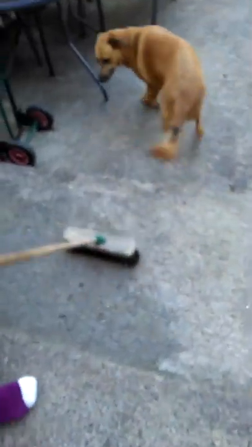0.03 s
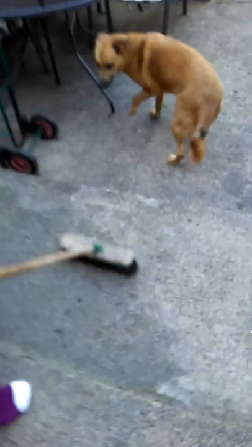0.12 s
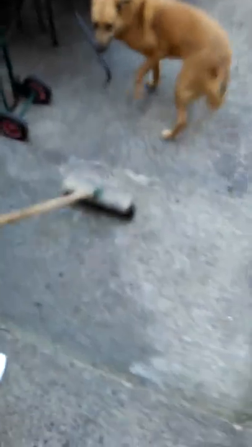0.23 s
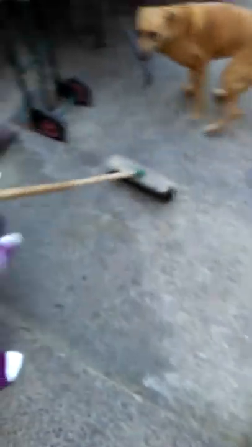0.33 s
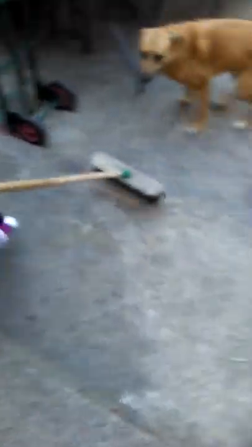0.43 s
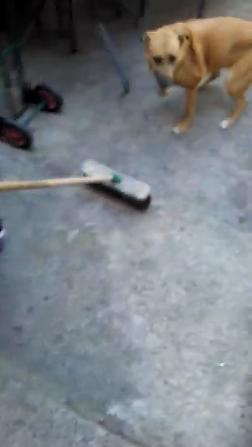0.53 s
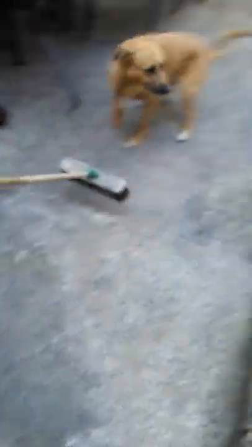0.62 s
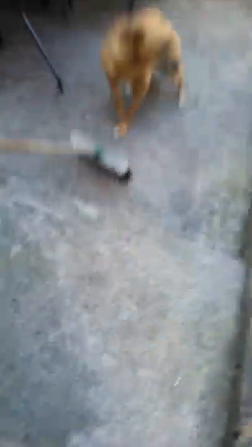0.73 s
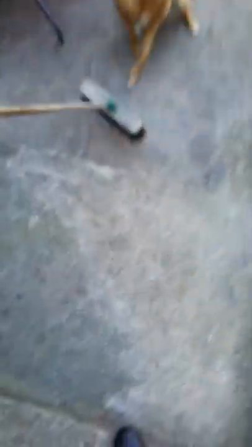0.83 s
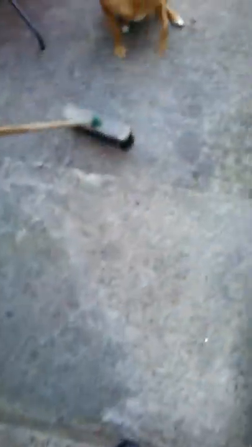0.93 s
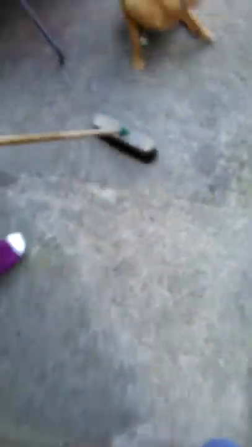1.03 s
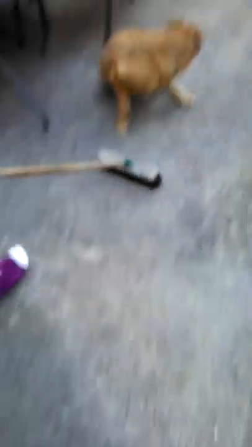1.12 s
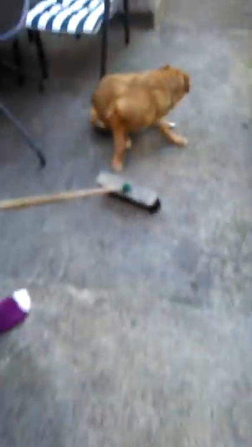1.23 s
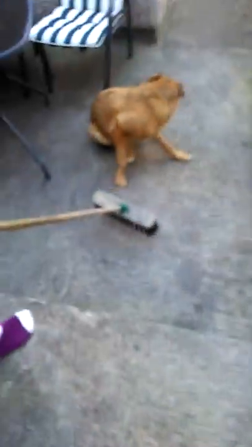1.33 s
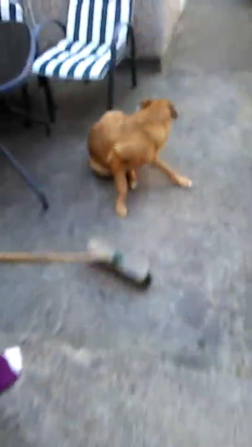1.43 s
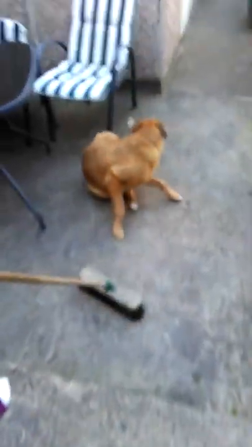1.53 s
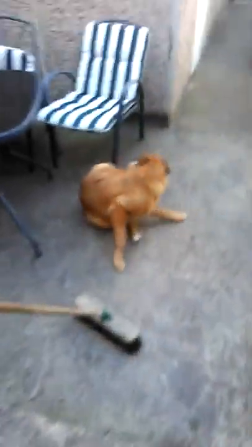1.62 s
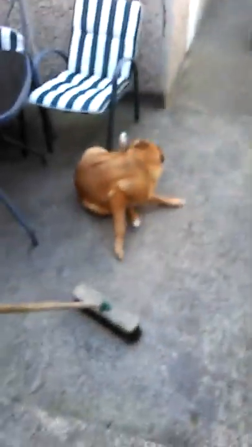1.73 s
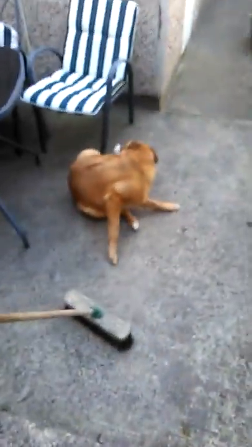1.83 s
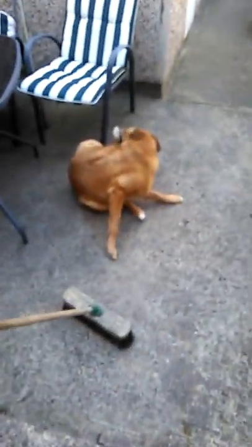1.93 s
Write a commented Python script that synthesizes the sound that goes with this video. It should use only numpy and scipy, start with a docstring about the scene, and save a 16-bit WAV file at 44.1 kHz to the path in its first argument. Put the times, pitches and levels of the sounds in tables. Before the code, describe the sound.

Close up on a patio, broom bristles rasp over concrete, pause, rasp again, then bump hard and scrub; a last brief knock follows, then a dog's low throaty grumble, with soft rumble and a short wall reflection.

```python
"""A concrete patio, close to a push broom scrubbing in short strokes, heard at two microphone ports.
Bristles flick over grit as random clicks and shake the wooden head; narrow bands ring as bristles sing
or the head rings on; short blows ring in modes with a puff of grit. A dog nearby ticks a claw, scuffs
and thumps a paw, and grumbles twice in throat pulses that ring in its chest. A low hum wavers under
rumble and thin outdoor air; the house wall answers the nearby sounds with a decaying tail."""
import sys
import numpy as np
from scipy import signal
from scipy.fft import rfft, irfft, next_fast_len
from scipy.io import wavfile
from scipy.ndimage import uniform_filter1d, map_coordinates

SR = 44100
rng = np.random.default_rng(int(sys.argv[2]) if len(sys.argv) > 2 else 0)


def dump(signal):
    """Clip the signal to [-1, 1] and save it as 16-bit WAV at the path in sys.argv[1]."""
    limited = np.clip(np.atleast_2d(signal).T, -1, 1)
    pcm = np.round(limited * 32767).astype(np.int16)
    wavfile.write(sys.argv[1], SR, pcm)


def gain_from_db(level_db):
    """Turn a decibel level (scalar or array-like) into a linear amplitude factor."""
    decades = np.asarray(level_db, float) / 20
    return 10 ** decades


N = 88200

# spectrum of bristles on gritty concrete: f/Hz, density/dB per Hz (relative)
BRISTLE_SPECTRUM = [(1200, -29.5), (2200, -9.5), (3250, -5), (3650, -3), (4400, -1.5), (5200, -4),
                    (6200, -3.5), (7500, -12), (10000, -17), (13300, -26), (14600, -34)]


def unit(x):
    """Scaled to rms 1."""
    return x / np.sqrt(np.mean(x ** 2) + 1e-20)


def along(points, hz):
    """(Hz, value) points interpolated on a log frequency axis."""
    f, v = np.transpose(points)
    return np.interp(np.log(hz + 1), np.log(f + 1), v)


def curves(rows):
    """One value per sample for each column after the time."""
    s, *cols = np.transpose(rows)
    return [np.interp(np.arange(N) / SR, s, c) for c in cols]


def wobble(rate):
    """A smooth random curve, rate knots a second."""
    knots = rng.standard_normal(int(N * rate / SR) + 4)
    return map_coordinates(knots, [np.arange(N) * rate / SR])


def filtered(x, response):
    """x times a complex response of frequency."""
    m = next_fast_len(N + SR // 2)
    return irfft(rfft(x, m) * response(np.fft.rfftfreq(m, 1 / SR)), m)[..., :N]


def coloured(x, spectrum):
    """x shaped by the given spectrum, rms 1."""
    return unit(filtered(x, lambda hz: gain_from_db(along(spectrum, hz))))


def patchy(x, db):
    """Random patches of gain over time and frequency, db rms."""
    z = signal.stft(x, nperseg=256)[2]
    field = rng.standard_normal(z.shape[-2:])
    field = uniform_filter1d(field, size=4, axis=0)  # frequency bins
    field = uniform_filter1d(field, size=10, axis=1)  # time frames
    return signal.istft(z * gain_from_db(db * unit(field)), nperseg=256)[1][..., :N]


def ports(pair):
    """Two versions of a wide sound reach two ports: alike in the bass, out of step and tinted above."""
    # likeness of the two ports: f/Hz, likeness (0 to 1)
    likeness = [(60, .97), (250, .96), (600, .85), (1400, .62), (3000, .5), (6000, .52), (14000, .45)]
    # tint between the ports: f/Hz, left over right/dB
    tint = [(60, -3), (250, 0), (1000, 0), (2300, 5.5), (4300, 7), (7900, -9.5), (14500, 4.5)]
    # the left port trails the right: f/Hz, phase/radians
    lag = [(150, 0), (400, 0.026), (620, 1.34), (14000, 1.79)]

    def spread(hz):
        """Weights of the shared and the opposed part."""
        turn = np.arccos(np.clip(along(likeness, hz), -1, 1)) / 2
        return np.array([np.cos(turn), np.sin(turn)])

    def tint_and_lag(hz):
        """Half the tint and lag on the left, the inverse half on the right."""
        half = gain_from_db(along(tint, hz) / 2) * np.exp(-.5j * along(lag, hz))
        return np.array([half, 1 / half])

    mid, side = filtered(pair, spread)
    return filtered(np.array([mid + side, mid - side]), tint_and_lag)


def hum():
    """A sine of wavering pitch and level, with a little that is opposite at the two ports."""
    # hum under the scene: t/s, level/dB (rms)
    hum_levels = [(0.0, -48), (0.38, -46.5), (0.42, -40), (0.52, -58), (0.6, -44.5), (1.02, -56.5),
                  (1.09, -36.5), (1.19, -54), (1.26, -43.5), (1.32, -54), (1.64, -44.5), (2.0, -57)]
    level_db, = curves(hum_levels)
    pitch_hz = 54.5 + 2.2 * wobble(7.22)
    phase = 2 * np.pi * np.cumsum(pitch_hz) / SR
    opposed = gain_from_db(-16.5) * np.cos(phase) * wobble(7.4) * [[1], [-1]]
    return np.sqrt(2) * gain_from_db(level_db) * (np.sin(phase) + opposed)


def outdoors():
    """Low rumble and thin air from all around: coloured noise whose levels drift."""
    # low rumble: f/Hz, density/dB per Hz (relative)
    rumble_spectrum = [(60, -47), (85, 3), (110, -5.5), (140, -1.5), (180, -10.5), (300, -18), (500, -29.5),
                       (800, -41.5)]
    # open air: f/Hz, density/dB per Hz (relative)
    air_spectrum = [(180, -37), (300, -6.5), (813, -13), (2200, -22.5), (3970, -27.5), (6170, -47),
                    (13100, -41.5), (14900, -60)]
    rumble = coloured(rng.standard_normal((2, N)), rumble_spectrum)
    rumble = gain_from_db(-59 + 2.4 * wobble(12.09)) * rumble
    air = coloured(patchy(rng.standard_normal((2, N)), db=-2.5), air_spectrum)
    air = gain_from_db(-65 + 3.3 * wobble(5.47)) * air
    return ports(rumble + air)


def flicks(patch_db, per_s=7000):
    """Bristle tips letting go of the grit at random, in clumps, in two independent versions."""
    fire = rng.random((2, N)) < per_s / SR
    size = gain_from_db(2.5 * rng.exponential(size=(2, N)).clip(0, 3.2))
    size = size * rng.choice([-1, 1], (2, N))
    clumps = gain_from_db(0.45 * wobble(80))
    return patchy(fire * size * clumps, patch_db)


def sweep():
    """Flicks hiss with changing brightness; further flicks shake the wooden head."""
    # bristles on the ground, stroke after stroke: t/s, scrape level/dB (ahead of the brightness),
    # shaken head over scrape level/dB, brightness/dB (treble up and bass down by as much)
    strokes = [(0, -80, 4, 12), (.012, -60.5, -9, -13.5), (.03, -67.5, -25, -3), (.0795, -77, -4, 7),
               (.081, -50, -10, 8.5), (.103, -65, 2, 13), (.1095, -63, 0, 7), (.111, -41.5, -7, 7),
               (.139, -55, -5, -1), (.185, -54, -5, 7.5), (.225, -35.5, -9, 3.5), (.272, -27, -9, 3.5),
               (.342, -26.5, -15, 3), (.40, -46.5, -8.5, 3.5), (.465, -59, -3.5, -0.5), (.54, -65, -3.5, 6),
               (.6245, -72, 12, 11), (.6275, -36, 5.5, 3), (.637, -33, -7, 0.5), (.669, -30.5, -15, 1.5),
               (.70, -43.5, -9.5, -0.5), (.765, -59, -9, 0), (.82, -56.5, -9.5, 0), (.845, -49, -7, -5.5),
               (.885, -54, -8.5, -2), (1.028, -63.5, -12, -6.5), (1.0525, -68, 7, -12.5),
               (1.0555, -36.5, 1, 5), (1.064, -35, -2, -4), (1.075, -30.5, -8.5, 0),
               (1.152, -29.5, -11.5, 1), (1.195, -35, -16.5, 0.5), (1.258, -56.5, -12.5, -3.5),
               (1.376, -65.5, -16, -1), (1.5115, -78.5, -19, -11.5), (1.515, -55, 7, -10),
               (1.5235, -46.5, -6, -10), (1.526, -35, -2, -3), (1.534, -41, 2, -1), (1.541, -34, 1.5, -3.5),
               (1.561, -43.5, -4.5, -2.5), (1.615, -55.5, -8.5, 0.5), (1.745, -61.5, -17, 6.5),
               (1.77, -63.5, -25, -2.5), (1.965, -76.5, -20, -8.5), (2, -64.5, -13, 6)]
    # the head, shaken by the bristles: f/Hz, density/dB per Hz (relative)
    shaken_head = [(200, -83), (380, -26), (465, -7), (560, -14.5), (750, -5.5), (960, -3), (1200, -9.5),
                   (1560, 0.5), (1850, 1), (2150, -14), (2500, -9), (3300, -27.5)]
    level_db, head_db, bright_db = curves(strokes)
    hiss = coloured(flicks(patch_db=1.5), BRISTLE_SPECTRUM)
    dull = filtered(hiss, lambda hz: 1 / (1 + (hz / 4500) ** 4))
    hiss = gain_from_db(-bright_db) * dull + gain_from_db(bright_db) * (hiss - dull)
    head = coloured(flicks(patch_db=3), shaken_head)
    return gain_from_db(level_db) * (hiss + gain_from_db(head_db) * head)


def grit_noise():
    """Noise in the colour of the bristles on grit, for the puffs in blows."""
    return coloured(rng.standard_normal((2, N)), BRISTLE_SPECTRUM)


def strike(s, db, centre_hz, crack_db, modes, grit):
    """One blow: the modes near its colour ring most, with a puff of grit."""
    t, at = np.arange(SR // 4) / SR, round(s * SR)
    rings = np.zeros((2, len(t)))
    for hz, mode_db, t60 in modes:
        luck_db = 1.6 * rng.standard_normal((2, 1))
        off_colour_db = 5.96 * (np.log2(hz / centre_hz) / 0.77) ** 2  # distance in units of 0.77 octave
        ring_db = mode_db + luck_db - off_colour_db - 60 * t / t60
        rings += gain_from_db(ring_db) * np.sin(2 * np.pi * hz * t)
    rings *= (1 - np.exp(-t * centre_hz / 0.22)) ** 2  # soft rise, 0.22 cycles of its colour
    crack_t60_s = 0.019
    puff = gain_from_db(crack_db - 60 * t / crack_t60_s) * np.roll(grit, -at, axis=1)[:, :len(t)]
    out = np.zeros((2, N + SR))
    out[:, at:at + len(t)] = gain_from_db(db) * (puff - rings / np.abs(rings[0]).max())
    return out[:, :N]


def claw_tick():
    """A claw ticks on the concrete and rings briefly in its modes."""
    # ticks close by: t/s, peak level/dB (first version, ahead of the ports)
    claw_ticks = [(0.0074, -32)]
    # claw modes: f/Hz, level/dB (relative), t60/s
    claw_modes = [(2420, 11, 0.0049), (4590, 11.5, 0.0067)]
    grit = grit_noise()
    return sum(strike(s, db, 3100, -43, claw_modes, grit) for s, db in claw_ticks)


def wall(x):
    """The house wall's answer, 500 samples late: each frequency dies at its own speed."""
    # decay of the answer: f/Hz, t60/s
    wall_decay = [(200, 0.42), (2000, 0.2), (10000, 0.12)]
    hz, t, z = signal.stft(rng.standard_normal((2, SR // 2)), SR, nperseg=256)
    decay = gain_from_db(-60 * t / along(wall_decay, hz)[:, None])
    tail = signal.istft(z * decay, SR, nperseg=256)[1]
    tail = tail / np.linalg.norm(tail[0])
    late = np.pad(x, (500, 0))[None]
    return gain_from_db(-17) * signal.fftconvolve(late, tail, axes=1)[:, :N]


def short_blows():
    """Short blows nearby: wooden knocks, a bright bite of bristles on grit, faint low thuds."""
    # blows close by: t/s, peak level/dB (ring, first version, ahead of the ports),
    # centre of its colour f/Hz, grit crack over the peak level/dB
    blows = [(0.0817, -40, 860, -11), (0.1092, -29, 920, -29), (0.114, -29, 480, -9.5),
             (0.6281, -28.5, 1540, -21), (0.632, -31, 1700, -23), (.630, -29.5, 460, -30),
             (0.662, -35.5, 287, -23), (1.054, -28, 980, -35), (1.0572, -21.5, 4300, -5),
             (1.0712, -20.5, 386, -11), (1.073, -16.5, 316, -28), (1.081, -24, 255, -17),
             (1.11, -29.5, 209, -28), (1.278, -45, 198, -8), (1.4467, -48, 1640, -10),
             (1.526, -29, 397, -4), (1.5372, -13, 328, -16.5), (1.5474, -21.5, 316, -37),
             (1.578, -25, 290, -40), (1.604, -35, 141, -37), (1.781, -43.5, 120, -33),
             (1.834, -44.5, 282, -11)]
    # modes that the blows share: f/Hz, level/dB (relative), t60/s
    blow_modes = [(120, -0.5, 0.16), (189.6, 10.5, 0.031), (253.7, -0.5, 0.043), (313.3, -4, 0.091),
                  (380, 6.5, 0.028), (492, 6, 0.012), (686, 8.5, 0.016), (922, 3, 0.038),
                  (1242, -6.5, 0.072), (1540, -4, 0.051), (1973, -9, 0.056), (4300, -6, 0.011)]
    grit = grit_noise()
    return sum(strike(*row, blow_modes, grit) for row in blows)


def ringing_bands():
    """Narrow bands of flicks, swelling and fading: bristles singing, and once the wooden head ringing on."""
    # narrow ringing bands: start t/s, length/s, level/dB (top of the swell), pitch f/Hz
    bands = [(0.232, 0.13, -38, 6100), (0.638, 0.028, -44, 1490), (0.83, 0.055, -56.5, 2470),
             (1.077, 0.14, -33.5, 4310), (1.11, 0.062, -47, 3280), (1.616, 0.15, -58, 3120)]
    t, out = np.arange(N) / SR, 0
    tips = flicks(patch_db=1.5, per_s=2000)
    for s, length, db, hz in bands:
        width_hz = 0.15 * hz
        band = filtered(tips, lambda f: 1j * f / (hz * hz - f * f + 1j * f * width_hz))
        swell = np.sqrt(np.abs(np.sin(np.pi * np.clip((t - s) / length, 0, 1))))
        out = out + gain_from_db(db) * swell * unit(band)
    return out


def paw_scuffs():
    """A paw drags softly: short rubs of noise that start quickly and fade."""
    # rubs close by: start t/s, length/s, level/dB (top of the swell)
    scuffs = [(0.47, 0.084, -49.5), (0.939, 0.037, -57.5)]
    # paw pad on concrete: f/Hz, density/dB per Hz (relative)
    pad_spectrum = [(250, -30), (460, 3), (650, -8), (950, -12.5), (1500, -3.5), (1850, -31.5)]
    t, shape = np.arange(N) / SR, 0
    for s, length, db in scuffs:
        progress = np.clip((t - s) / length, 0, 1)
        shape = shape + gain_from_db(db) * np.sin(np.pi * progress ** 0.46)
    return shape * coloured(rng.standard_normal((2, N)), pad_spectrum)


def paw_thump():
    """A paw lands with a soft thump, a short low ring."""
    # thumps close by: t/s, peak level/dB (first version, ahead of the ports)
    thumps = [(1.445, -38)]
    # paw mode: f/Hz, level/dB (relative), t60/s
    paw_modes = [(270, 0, 0.049)]
    grit = grit_noise()
    return sum(strike(s, db, paw_modes[0][0], -42, paw_modes, grit) for s, db in thumps)


def grumbles():
    """The dog's slow throat pulses ring in the chest, swelling and fading."""
    # dog nearby: start t/s, length/s, level/dB (top of the swell), pulse rate at start and end f/Hz
    growls = [(1.645, 0.12, -40, 70.8, 66.6), (1.873, 0.098, -45, 56.8, 75.7)]
    # chest resonances, passed twice: f/Hz, width/Hz and level/dB of one pass
    chest_modes = [(144.5, 40, 0.5), (227.5, 74, 2), (271, 51, -2)]
    t, pulses = np.arange(N) / SR, np.zeros(N)
    for s, length, db, first, last in growls:
        u = np.clip((t - s) / length, 0, 1)
        jitter = 1 + 0.012 * wobble(50)
        rate = (first + (last - first) * u) * jitter
        beats = np.diff(np.floor(np.cumsum(rate * (t > s)) / SR), prepend=0)
        swell = np.sin(np.pi * u) ** 1.3
        pulses += gain_from_db(db) * swell * beats * np.sqrt(SR / rate)  # equal power at any rate

    def chest(f):
        """Resonances of alternating sign, passed twice."""
        once = 0
        for k, (c, w, db) in enumerate(chest_modes):
            once = once + (-1) ** k * gain_from_db(db) * 1j * f * w / (c * c - f * f + 1j * f * w)
        return once ** 2

    gain = np.sqrt(np.mean(np.abs(chest(np.linspace(0, SR / 2, num=4000))) ** 2))
    return filtered(pulses, chest) / gain


def scene():
    """Broom, dog, wall and outdoor background at the two ports."""
    near = sweep() + claw_tick() + short_blows() + ringing_bands() + paw_scuffs() + paw_thump()
    return hum() + outdoors() + ports(near) + wall(near[0]) + grumbles()


def low_pass(x):
    """Removes everything above the highest recorded frequency."""
    return signal.sosfilt(signal.butter(12, 15060, fs=SR, output="sos"), x)


def record(dry):
    """Band limits of the finished mix: a soft roll-off in the bass, a sharp edge at the top."""
    low_hz, top_hz = 46.6, 14600

    def band(hz):
        """Two bass roll-offs in a row, and nothing from top_hz up."""
        bass = 1j * hz / (low_hz + 1j * hz) / (1 + (low_hz / (hz + 1)) ** 4)
        return (hz < top_hz) * bass

    return low_pass(filtered(dry, band))


dry = scene()
out = record(dry)
dump(out)
```